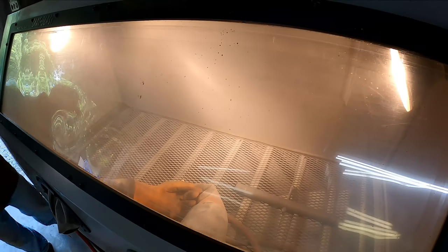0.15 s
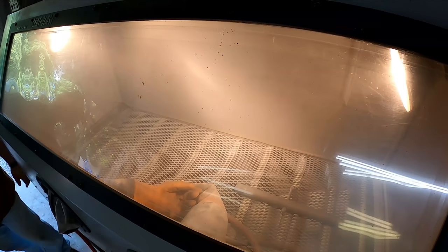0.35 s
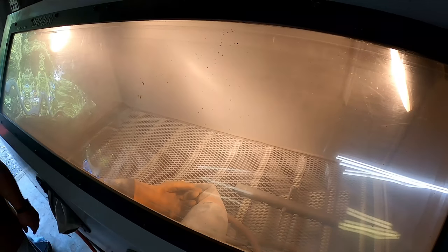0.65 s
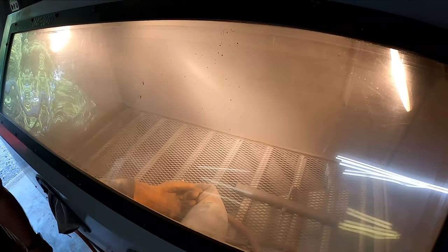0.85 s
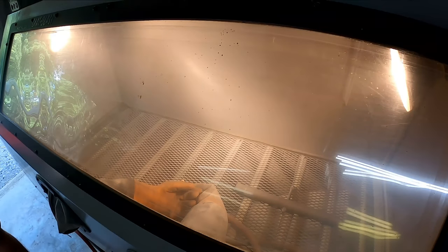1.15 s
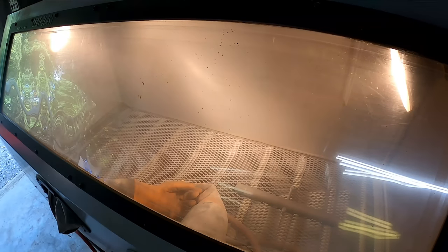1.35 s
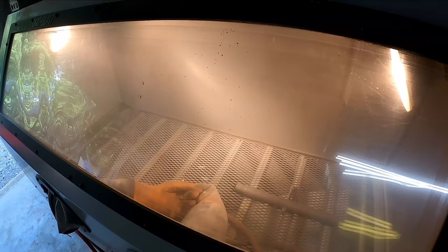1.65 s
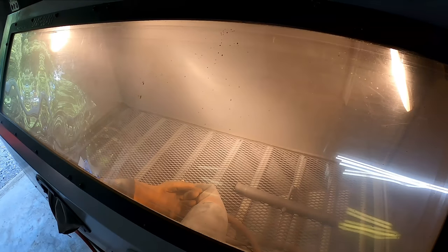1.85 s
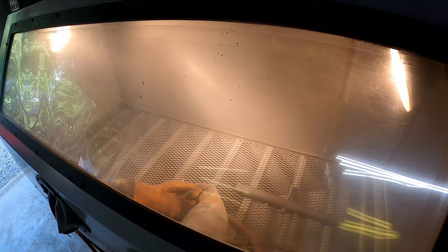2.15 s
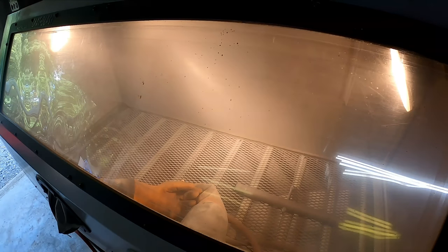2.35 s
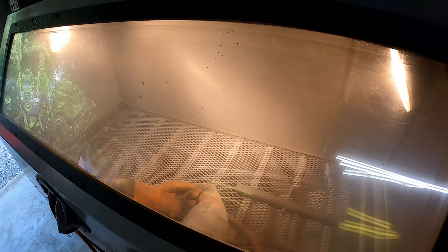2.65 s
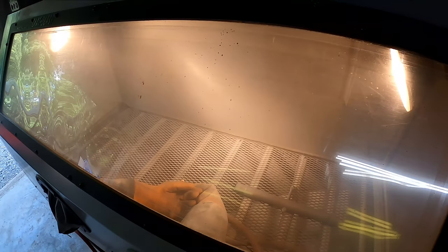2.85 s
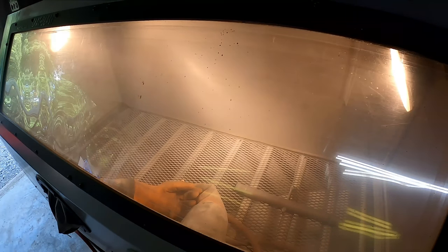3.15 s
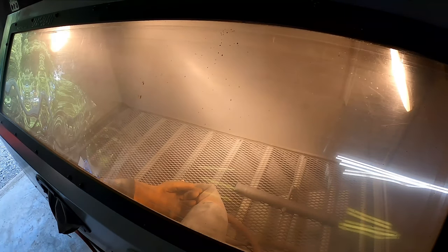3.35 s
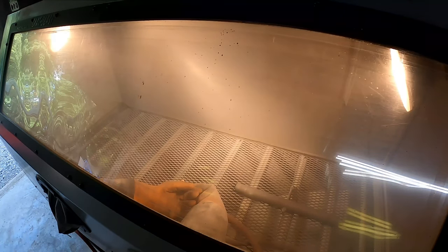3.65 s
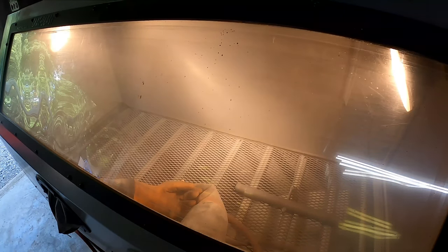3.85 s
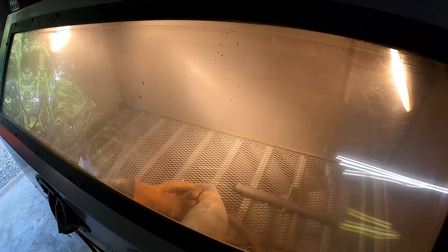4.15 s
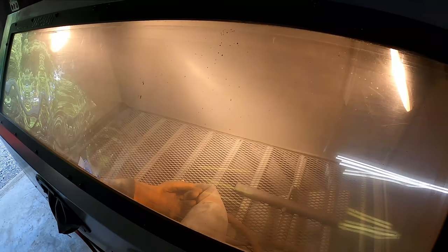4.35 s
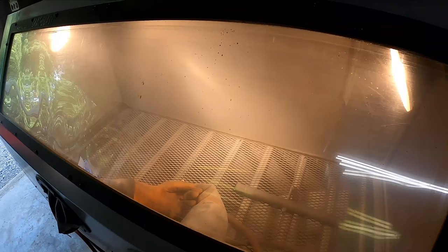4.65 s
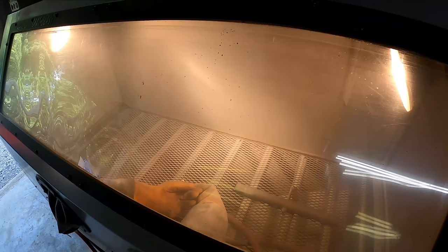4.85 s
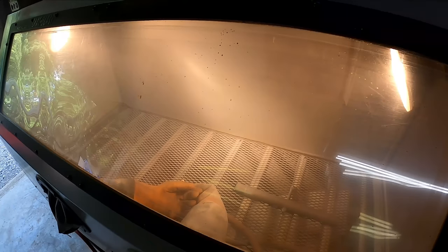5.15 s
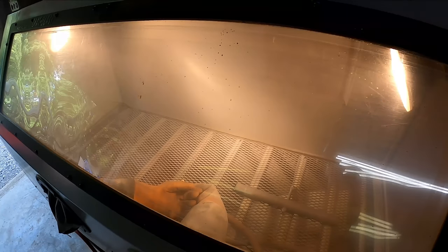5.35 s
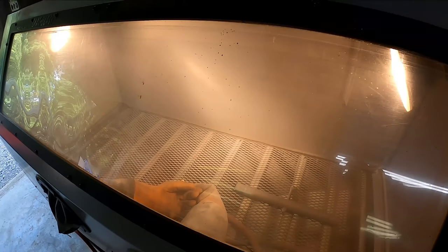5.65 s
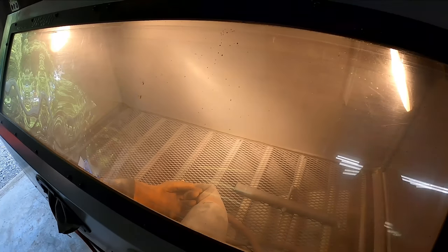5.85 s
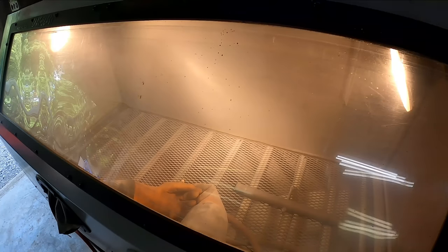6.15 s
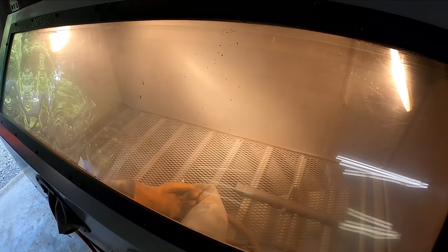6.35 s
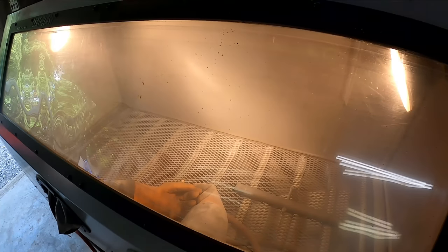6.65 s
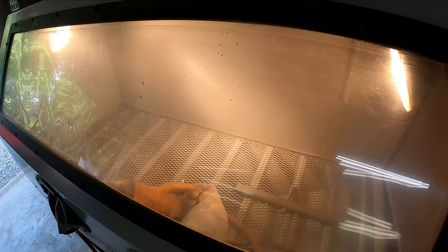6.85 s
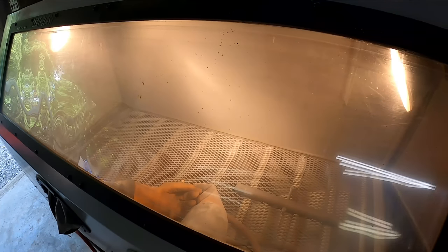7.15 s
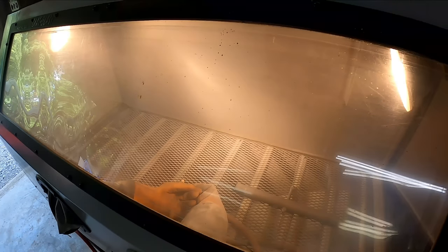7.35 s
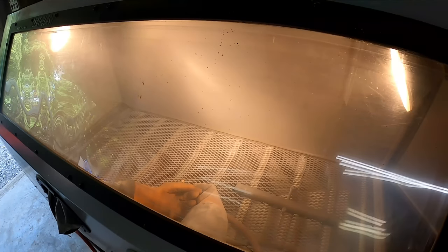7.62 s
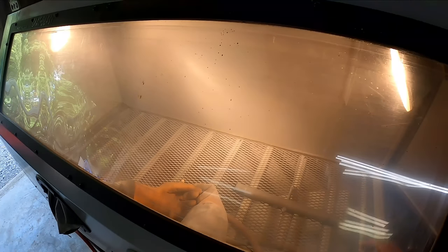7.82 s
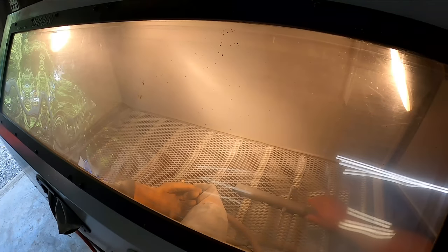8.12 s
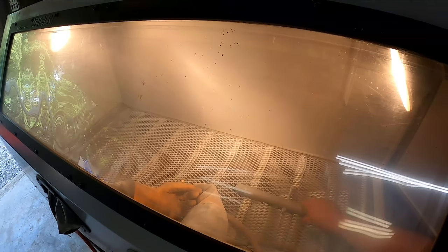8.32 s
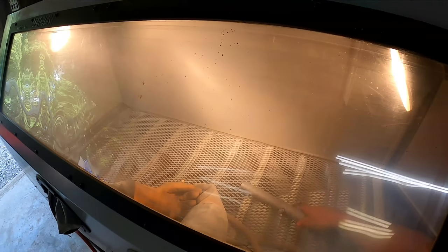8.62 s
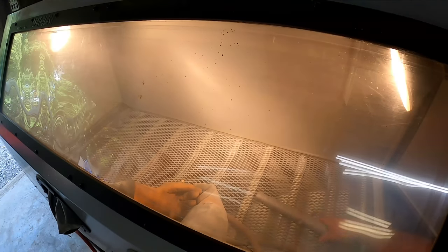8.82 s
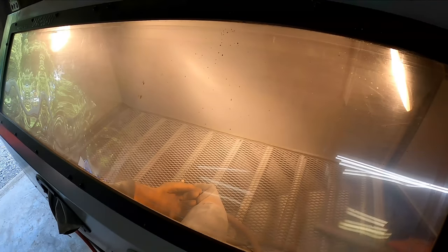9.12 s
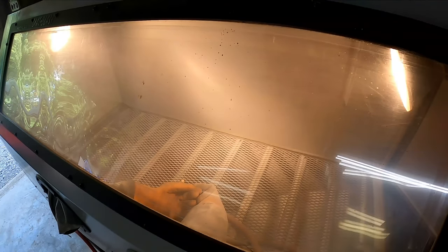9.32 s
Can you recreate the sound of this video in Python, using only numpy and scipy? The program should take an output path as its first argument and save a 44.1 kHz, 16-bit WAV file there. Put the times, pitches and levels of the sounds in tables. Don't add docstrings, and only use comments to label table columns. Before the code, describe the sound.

Constant machine hum and rushing air, with a couple of sharp valve clicks, one loud metallic clank, then thumps and a short drag across a metal grate.

```python
import sys
import numpy as np
from scipy import signal
from scipy.fft import rfft, irfft, next_fast_len
from scipy.io import wavfile
from scipy.ndimage import uniform_filter1d

SR = 44100
rng = np.random.default_rng(int(sys.argv[2]) if len(sys.argv) > 2 else 0)


def linear_from_db(decibels):
    return 10 ** (np.asarray(decibels, float) / 20)


def wrap_up_sound(samples):
    columns = np.atleast_2d(samples).T
    tamed = np.clip(columns, -1, 1)
    steps = np.round(tamed * 32767).astype(np.int16)
    wavfile.write(sys.argv[1], SR, steps)


N = 418068
T = np.arange(N) / SR

SHAFT_HZ, BLADE_HZ = 36.22, 361.12
SHAFT_DB, BLADE_DB, FRAME_DB, AIR_DB = -26, -25, -34, -38.5
FRAME_DB_PER_S, AIR_DB_PER_S = 0.07, 0.3737
FRAME_LATE_DB, FRAME_LATE_S = -7.5, 0.12
# order, level_db
SHAFT_ORDERS = [(3, -20), (4, -26.5), (5, -21), (6, -17), (7, -20.5), (8, -0.5), (9, -12), (11, -33),
                (14, -28), (17, -26), (22, -29.5), (23, -25)]
# order of the shaft, level_db
FRAME_ORDERS = [(1, -0.5), (2, -3)]
# harmonic, level_db
BLADE_HARMONICS = [(1, 0.5), (2, -44), (3, -26.5), (6, -30), (12, -38), (18, -55)]
# time_s, blade_gain_db
STANDING_WAVE = [(0, -.5), (.6, 0.8), (.97, -.6), (1.9, 0.7), (2.8, -0.7), (3.7, -0.5), (4.46, 0.1),
                 (5.2, 2.5), (5.5, 1), (5.9, 0.2), (6.25, 1.2), (6.55, 0.4), (7.4, 1.83), (9.48, 0.3)]
SHAFT_LOSS = 0.96

# frequency_hz, density_db (per Hz)
AIR_SPECTRUM = [(20, -8.5), (40, 15), (70, 2.5), (150, 4.5), (300, 1), (500, -3), (950, -3.5),
                (1300, -10.5), (2200, -12), (3200, -14.5), (5000, -24.5), (7600, -26), (10000, -37.5),
                (14000, -30)]
# pitch_hz, level_db (over the air)
WHINES = [(706.3, -12.5), (923.7, -12.5), (1195, -21), (1579, -18.5), (5210, -31.5)]
# centre_hz, width_hz, gain_db
DUCT_MODES = [(770, 22, 0.5), (934, 160, 3.5), (1120, 73, 0.5), (1590, 60, 2), (2180, 66, 7),
              (4570, 290, 2)]
# frequency_hz, likeness (0-1)
LIKENESS = [(60, 1.0), (130, 0.98), (280, 0.81), (620, 0.75), (1350, 0.6), (2950, 0.53), (6420, 0.1),
            (14000, 0)]
AIR_TILT_DB, AIR_TILT_START_DB, TILT_SETTLE_S = .5, -1.1, 3.1

# start_s, level_db, gush_s, centre_hz, width_octaves
PUFFS = [(1.878, -37.5, .026, 2560, 0.85), (5.928, -40.5, 0.012, 2500, 0.94),
         (5.980, -43, 0.022, 3020, 0.98), (6.011, -18.5, 0.077, 4000, 0.76), (6.03, -26.5, 0.1, 177, 0.86),
         (6.706, -50.5, .07, 7250, .26), (8.388, -30, 0.025, 2440, 0.52), (8.39, -38, 0.048, 597, 0.52),
         (8.71, -29.5, 0.086, 1900, 0.73), (8.72, -32.5, 0.15, 368, 0.67), (8.74, -42.5, .07, 3770, 0.64),
         (8.765, -27, 0.081, 1690, 0.91), (9.05, -32, 0.11, 176, 1)]
# start_s, level_db, gush_s, centre_hz, width_octaves
CLICKS = [
    (2.9733, -23.5, 0.018, 2900, 1.25),
    (3.3174, -31.5, 0.0083, 2900, 1.1),
]
# start_s, level_db, gush_s, centre_hz,
# width_octaves
TAPS = [(2.973, -29, 0.038, 12750, 0.064), (3.317, -32, 0.063, 13150, 0.044),
        (2.975, -31, 0.025, 650, 0.43), (3.319, -34, 0.028, 600, 0.58), (6.003, -20, 0.013, 1710, 0.88),
        (6.699, -33.5, 0.026, 1300, 1.), (6.699, -41.5, 0.019, 4270, 0.29), (7.527, -31.5, 0.01, 1400, 0.8),
        (7.528, -39, 0.012, 2900, 0.18), (8.389, -44, 0.038, 5000, 0.84), (8.39, -49, 0.045, 12300, .07)]
# centre_hz, width_hz, gain_db
STEEL_MODES = [(1180, 370, 12), (1800, 230, 6.5), (2360, 240, 2.5), (2900, 150, 1), (3960, 180, 1.5),
               (4550, 220, 0), (5850, 250, 0)]
# crack_db (over the gush), rise (share of the gush length)
PUFF_START, CLICK_START, TAP_START = (-11, 0.14), (9.9, 0.061), (-0.98, 0.29)
REBOUND = 0.32

# start_s, peak_db, pitch_hz, t60_s
THUMPS = [(6.005, -16.5, 42.2, 0.52), (6.010, -9, 62.4, 0.2), (6.03, -24, 149, 0.1),
          (6.045, -19.5, 213, 0.17), (6.105, -12, 70, 0.29), (8.722, -22, 154, 0.083),
          (8.75, -9, 208, 0.12), (8.785, -16.5, 263, 0.1), (8.785, -12, 191, .1), (8.845, -8, 207, 0.063),
          (8.93, -15.5, 206, 0.077), (9.09, -19, 263, 0.11), (9.14, -29, 230, 0.088),
          (9.42, -20.5, 274, 0.081)]
# start_s, peak_db, pitch_hz, t60_s
RINGS = [
    (6.008, -24, 1180, .12),
    (6.010, -24, 2150, .12),
    (6.008, -30, 1780, .06),
    (6.035, -26, 3950, .12),
    (6.05, -27, 1000, .1),
    (6.700, -38, 4600, .08),
    (8.392, -37, 2450, .08),
    (7.529, -36, 2870, .09),
    (7.529, -34, 1170, .06),
    (8.392, -35, 2230, .15),
]
THUMP_RISE_CYCLES, RING_RISE_CYCLES = 0.8, 0.46
# time_s, level_db
DRAG_LEVEL = [
    (8.849, -39.5),
    (8.92, -44),
    (8.97, -35),
    (9.03, -40.5),
    (9.1, -37.5),
    (9.18, -41),
    (9.28, -38),
    (9.38, -37),
    (9.48, -47),
]
# frequency_hz, density_db (per Hz)
DRAG_SPECTRUM = [(120, -3), (250, 5.5), (500, -4.5), (1000, -0.5), (2200, -3), (3800, -10.5), (5500, -22),
                 (9000, -38)]
ROOM_T60_S, ROOM_DB, ROOM_GAP_S = 0.38, 5, 0.0019

# frequency_hz, level_db
PORT_LEVEL = [(60, 1.9), (110, 1.9), (200, 1.8), (370, 2.3), (680, 2), (1240, 2), (2270, 2.8), (4170, 2.5),
              (7640, 3), (14000, -27.5)]
# frequency_hz, phase_rad
PORT_PHASE = [ (60, 0.03), (150, 0.08), (360, -0.085), (800, -0.48), (2200, 0.084), (4500, -1.24),
              (8000, -0.7)]
# frequency_hz, gain_db
MICROPHONE = [(20, 0.5), (8000, 0), (9700, -4), (10900, -10), (12400, -13.5), (13600, -17.5), (14600, -45)]
# start_s, depth_db, recovery_s
DUCKS = [
    (2.02, 0.5, 0.25),
    (2.975, -6, 0.021),
    (2.975, -2, 0.25),
    (3.32, 0, 0.081),
    (5.33, -0.5, 1.46),
    (6.011, -5.5, 0.15),
    (6.012, -3, 0.64),
    (6.45, -1.3, 0.25),
    (8.76, -2.5, 0.22),
]
GAIN_START_DB, GAIN_OPEN_S, DUCK_ATTACK = -6.5, .9, 0.12
STEREO_FROM_S, STEREO_OPEN_S, STEREO_LEAK = 2.9, 1.52, 0.033
# centre_hz, width_hz, left_db, right_db
CIRCUIT = (11757.5, 151, -88.5, -71.5)
# start_s, recovery_s, level_db
DROPOUT = (6.5615, .007, -18)
# frequency_hz, level_db (per bin)
BAND_THRESHOLD = [(300, -98.5), (2000, -94), (5000, -93), (8000, -88.5), (10000, -94), (12000, -89.5),
                  (14000, -85)]


def unit(x):
    return x / np.sqrt(np.mean(x ** 2))


def along(table, hz):
    f, v = np.transpose(table)
    return np.interp(np.log(hz + 1), np.log(f), v)


def peaks(rows, hz):
    return 1 + sum((linear_from_db(db) - 1) / (1 + (2 * (hz - f) / width) ** 2) for f, width, db in rows)


def filtered(x, order, hz, kind="low"):
    return signal.sosfilt(signal.butter(order, hz, kind, fs=SR, output="sos"), x)


def walk(rate):
    hold = int(SR / rate)
    steps = np.repeat(rng.standard_normal(N // hold + 1), hold)
    return 0.93 * uniform_filter1d(uniform_filter1d(steps, hold), hold)[:N]


def pair(size, gain, alike):
    mid, side = rfft(rng.standard_normal((2, size))) * gain
    mid, side = mid * np.sqrt(1 + alike), side * np.sqrt(1 - alike)
    return irfft(np.array([mid + side, mid - side]), size)


def lines(rows, wobble_db, drift_rad, rate, base_hz=1):
    out = 0
    for multiple, db in rows:
        level = linear_from_db(db + wobble_db * walk(rate)) * np.sqrt(2)
        cycles = multiple * base_hz * T + rng.random()
        out = out + level * np.sin(2 * np.pi * cycles + drift_rad * walk(rate))
    return out


def shaft_hum(standing_db):
    return linear_from_db(SHAFT_DB - SHAFT_LOSS * standing_db) * lines(SHAFT_ORDERS, .5, .08, 3, SHAFT_HZ)


def blade_tone(standing_db):
    tone = lines(BLADE_HARMONICS[:1], .3, .08, 3, BLADE_HZ)
    tone += lines(BLADE_HARMONICS[1:], 1.5, 1.5, 12, BLADE_HZ)
    return linear_from_db(BLADE_DB + standing_db) * tone


def air():
    size = next_fast_len(N)
    hz = np.fft.rfftfreq(size, 1 / SR)
    gain = linear_from_db(along(AIR_SPECTRUM, hz)) * peaks(DUCT_MODES, hz)
    gain = gain / np.sqrt(np.mean((gain * (hz > 450) * (hz < 6000)) ** 2) * 2)
    alike = np.clip(1.33 * along(LIKENESS, hz) - .27, 0, .995)
    flow_db = AIR_DB + AIR_DB_PER_S * T
    tilt_db = AIR_TILT_DB + AIR_TILT_START_DB * np.exp(-T / TILT_SETTLE_S)
    out, rush = 0, rfft(pair(size, gain, alike))
    for centre in 30 * 2. ** np.arange(10):
        share = np.cos(np.pi / 2 * np.clip(np.log2((hz + 1) / centre), -1, 1)) ** 2
        flicker = linear_from_db(1.1 * walk(9) + tilt_db * np.log2(centre / 1000))
        out = out + flicker * irfft(rush * share, size)[:, :N]
    return linear_from_db(flow_db) * (out + lines(WHINES, 1.3, 1.3, 8))


def frame_shake():
    level_db = FRAME_DB + FRAME_DB_PER_S * T + FRAME_LATE_DB * np.exp(-T / FRAME_LATE_S)
    return linear_from_db(level_db) * lines(FRAME_ORDERS, .5, .08, 3, SHAFT_HZ)


def bursts(rows, crack_db, rise):
    out, size, lead_s = np.zeros(N + SR), SR // 2, .002
    t, hz = np.arange(size) / SR, np.fft.rfftfreq(size, 1 / SR)
    lead = np.exp(-2j * np.pi * hz * lead_s)
    for s, db, length, centre_hz, octaves in rows:
        grit = rng.standard_normal(size) * linear_from_db(1.4 * rng.exponential(size=size))
        burst = unit(grit) * np.clip(t / (rise * length), 0, 1) * np.exp(-(t / length) ** 2)
        burst[:36:6] += 10 * linear_from_db(crack_db) * (-REBOUND) ** np.arange(6)
        colour = np.exp(-.5 * (np.log2((hz + 1) / centre_hz) / octaves) ** 2) * peaks(STEEL_MODES, hz)
        i = int((s - lead_s) * SR)
        out[i:i + size] += linear_from_db(db) * irfft(rfft(burst) * unit(colour) * lead, size)
    return out[:N]


def air_puffs():
    return bursts(PUFFS, *PUFF_START)


def valve_clicks():
    return bursts(CLICKS, *CLICK_START)


def steel_taps():
    return bursts(TAPS, *TAP_START)


def modes(rows, rise_cycles):
    out, t = np.zeros(N + SR), np.arange(SR // 2) / SR
    for s, db, hz, t60 in rows:
        swing = (1 - np.exp(-t * hz / rise_cycles)) * linear_from_db(db - 60 * t / t60)
        i = int(s * SR)
        out[i:i + len(t)] += swing * np.sin(2 * np.pi * hz * t)
    return out[:N]


def sheet_thumps():
    return modes(THUMPS, THUMP_RISE_CYCLES)


def steel_rings():
    return modes(RINGS, RING_RISE_CYCLES)


def bar_drag():
    size = next_fast_len(N)
    hz = np.fft.rfftfreq(size, 1 / SR)
    ticks = rng.standard_normal(size) * linear_from_db(3.2 * rng.exponential(size=size))
    gain = linear_from_db(along(DRAG_SPECTRUM, hz))
    gain = gain / np.sqrt(np.mean((gain * (hz > 1200) * (hz < 4500)) ** 2))
    s, db = np.transpose(DRAG_LEVEL)
    level = linear_from_db(np.interp(T, s, db) + 0.4 * walk(40)) * (T > s[0])
    return irfft(rfft(unit(ticks)) * gain, size)[:N] * level


def room(x):
    t = np.arange(SR // 2) / SR
    alike = np.exp(-np.fft.rfftfreq(len(t), 1 / SR) / 3000)
    tail = unit(pair(len(t), 1., alike)) * linear_from_db(-60 * t / ROOM_T60_S) * (t > ROOM_GAP_S)
    tail = tail / np.sqrt(np.sum(tail ** 2) / 2)
    wet = signal.fftconvolve(x[None], tail, axes=1)[:, :N]
    return x + linear_from_db(ROOM_DB) * filtered(wet, 1, 9000)


def scene():
    standing_db = np.interp(T, *np.transpose(STANDING_WAVE))
    machines = shaft_hum(standing_db) + blade_tone(standing_db) + air() + frame_shake()
    struck = air_puffs() + valve_clicks() + steel_taps() + steel_rings() + bar_drag()
    return machines + room(struck) + sheet_thumps()


def ports(x):
    edge = 2048
    size = next_fast_len(N + 2 * edge)
    hz = np.fft.rfftfreq(size, 1 / SR)
    step = np.sqrt(linear_from_db(along(PORT_LEVEL, hz)) * np.exp(1j * along(PORT_PHASE, hz)))
    response = linear_from_db(along(MICROPHONE, hz)) * np.array([step, 1 / step])
    padded = np.pad(x, ((0, 0), (edge, edge)), "reflect", reflect_type="odd")
    return irfft(rfft(padded, size) * response, size)[:, edge:edge + N]


def gain_db():
    out = GAIN_START_DB * np.exp(-T / GAIN_OPEN_S)
    for s, db, recovery in DUCKS:
        since = np.clip(T - s, 0, None)
        out = out + db * (1 - np.exp(-since / (DUCK_ATTACK * recovery))) * np.exp(-since / recovery)
    return out


def circuit_whine():
    centre_hz, width_hz, *db = CIRCUIT
    size = next_fast_len(N)
    band = np.exp(-((np.fft.rfftfreq(size, 1 / SR) - centre_hz) / width_hz) ** 2)
    return unit(pair(size, band, 0.))[:, :N] * linear_from_db(np.array(db))[:, None]


def stereo_opening(left, right, width):
    side = (left - right) / 2
    trace = filtered(filtered(side, 2, 450, "high"), 1, 1800)
    treble = filtered(side, 2, 3500, "high")
    opened = width * side + (width ** 0.25 - width) * treble - 0.13 * (1 - width) * trace
    lone = 0.85 * (1 - width ** 0.4) * filtered(left - right, 4, 7500, "high")
    return left + right + lone, 2 * opened


def spectral_gate(x, width):
    window = np.sin(np.pi * (np.arange(2048) + .5) / 2048)
    padded = np.pad(x, ((0, 0), (0, 4096)), "reflect", reflect_type="odd")
    hz, t, z = signal.stft(padded, SR, window, 2048, 1024)
    z, centre_hz = z[:, :1024], hz[4:1024:8, None]
    power = (np.abs(z.reshape(2, 128, 8, -1)) ** 2).mean(axis=2)
    band_db = 10 * np.log10(power + 1e-18)
    loud_db = band_db[0, 8:36].mean(axis=0)
    bar_db = along(BAND_THRESHOLD, centre_hz) + 0.33 * (loud_db + 76.5)
    stereo = np.interp(t, T, width) > .02
    bar_db = bar_db + np.where(stereo, 1.5, 4.5) * rng.standard_normal(len(t))
    bar_db = bar_db - 1.5 * ~stereo
    bar_db = bar_db + np.array([0, 7.])[:, None, None] * ~stereo
    keep = band_db > bar_db + 2.5 * rng.standard_normal(band_db.shape)
    hiss = linear_from_db(band_db - 10.5 + 6 * centre_hz / 10000) * (centre_hz > 2500)
    chance = rng.standard_normal((2, *z.shape))
    z = z + np.repeat(hiss, 8, axis=1) * (chance[0] + 1j * chance[1])
    z = z * np.repeat(keep, 8, axis=1)
    return signal.istft(np.pad(z, ((0, 0), (0, 1), (0, 0))), SR, window, 2048, 1024)[1][:, :N]


def top_cut(x):
    return signal.sosfilt(signal.butter(12, 14600, fs=SR, output="sos"), x)


def record(dry):
    left, right = np.tanh(1.288 * ports(dry) * linear_from_db(gain_db())) / 1.32
    leak = STEREO_LEAK * np.clip(1 - T / STEREO_FROM_S, 0, 1)
    opening = 1 - np.exp(-np.abs(T - STEREO_FROM_S) / STEREO_OPEN_S)
    width = np.where(T < STEREO_FROM_S, leak, opening)
    total, difference = stereo_opening(left, right, width)
    whine = circuit_whine()
    start_s, recovery_s, level_db = DROPOUT
    since = np.clip(T - start_s, 0, 1)
    dip = linear_from_db(level_db * np.exp(-(since / recovery_s) ** 2) * (T > start_s))
    mid_side = np.array([total + whine[0] + whine[1], difference + whine[0] - whine[1]]) / 2
    mid, side = spectral_gate(mid_side * dip, width)
    return top_cut(np.array([mid + side, mid - side]))


dry = scene()
out = record(dry)
wrap_up_sound(out)
```